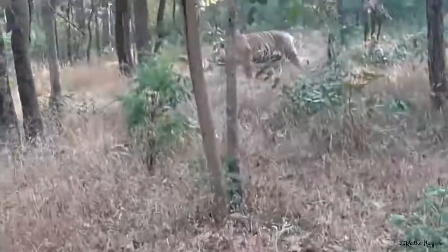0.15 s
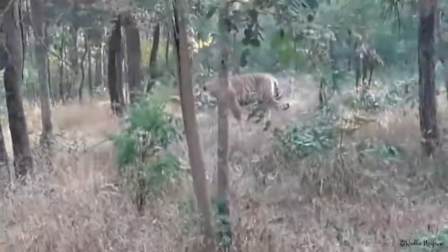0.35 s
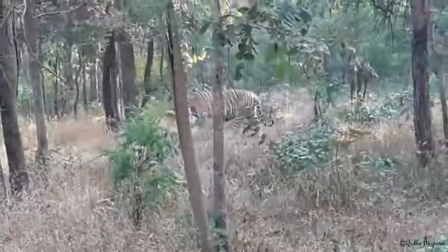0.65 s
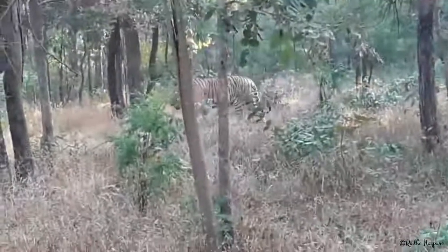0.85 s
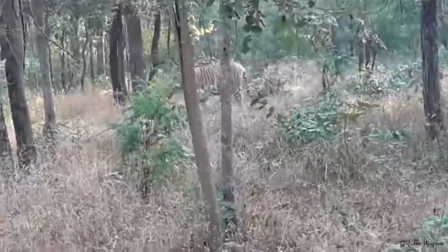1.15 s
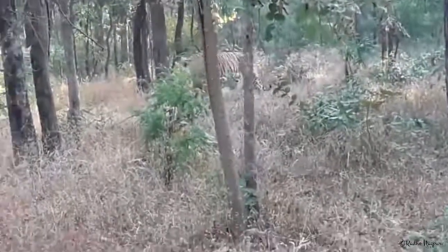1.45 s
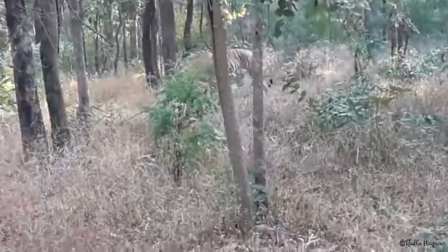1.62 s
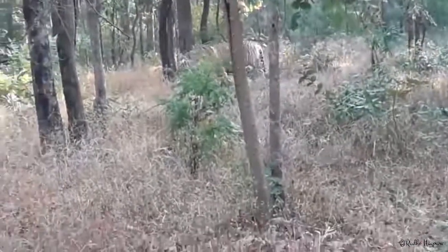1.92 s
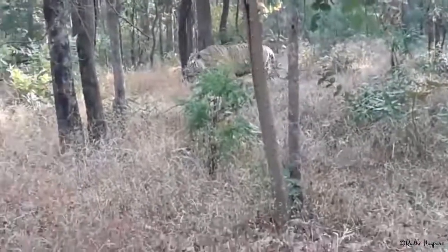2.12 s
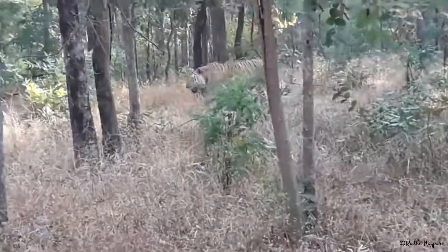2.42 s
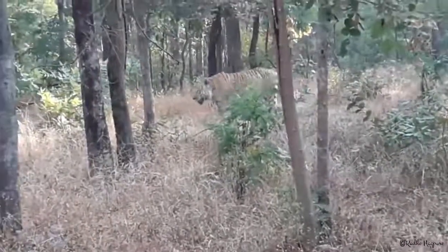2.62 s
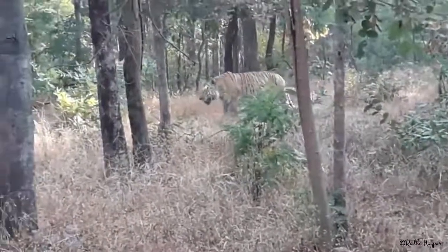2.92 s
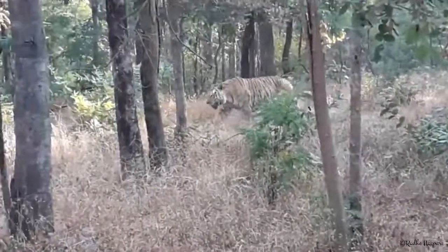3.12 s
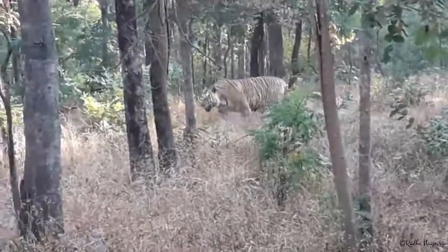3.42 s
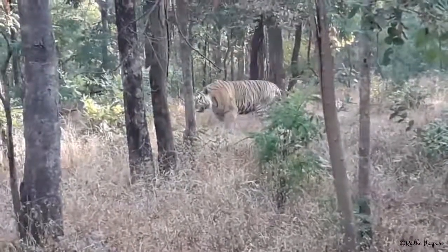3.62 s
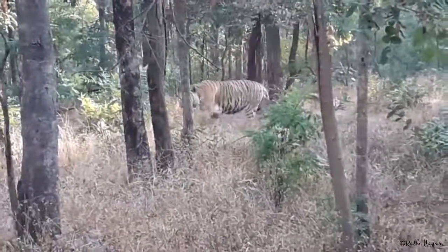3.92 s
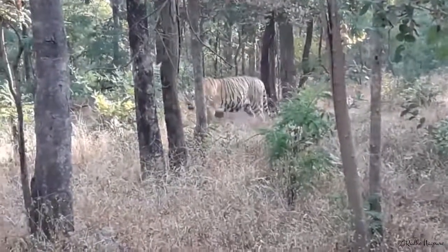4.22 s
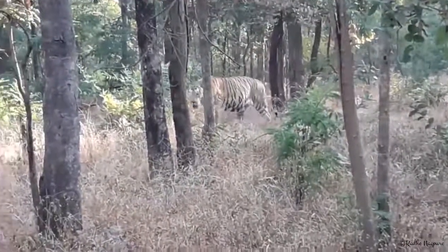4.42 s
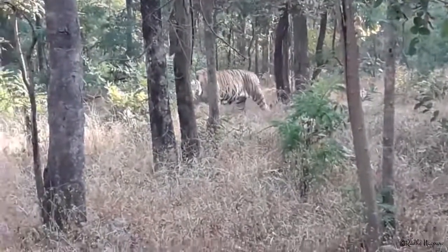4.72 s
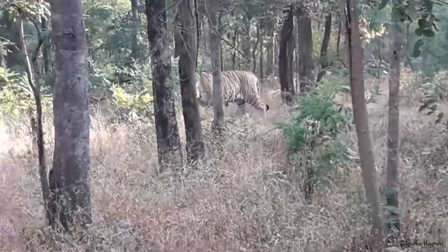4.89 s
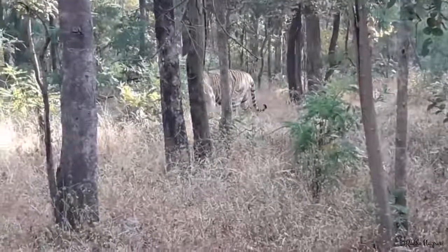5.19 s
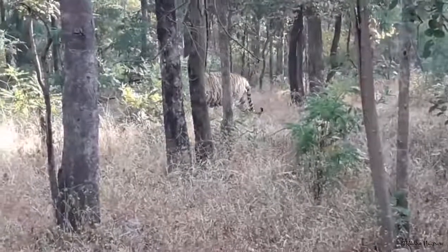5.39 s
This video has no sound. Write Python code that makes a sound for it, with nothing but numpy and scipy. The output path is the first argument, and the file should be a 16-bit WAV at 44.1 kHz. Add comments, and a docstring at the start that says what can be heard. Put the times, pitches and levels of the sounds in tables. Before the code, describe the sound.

Soft chirps and a quick tiny trill over very quiet forest air give way to an abrupt, wavering broadband noise. Rough, low monkey barks follow, each dropping to a grunt with a long woodland echo. One deer alarm call, whistle-sharp and by far the loudest event, cuts through after dry twig snaps. A rattling cough and a faint bark close it. Wide, natural outdoor pickup; the tiger stays silent.

```python
"""A small bird's slurred whistles over a hushed dry forest, on alert as a tiger (unheard) walks by; then the
background noise abruptly turns louder. A langur barks: pulsed vocal folds drop in pitch through throat
resonances that move as the jaw closes. A spotted deer gives one piercing yelp, a whistle over a low voice;
a second monkey coughs from pulsed folds. An insect whine, dry snaps, a rustle and the background are shaped
noise. Echoes of decaying noise blur the bird, and scatter and ring behind the larger callers and the snaps."""
import sys
import numpy as np
from scipy import signal
from scipy.fft import rfft, irfft, next_fast_len
from scipy.io import wavfile
from scipy.ndimage import map_coordinates

SR = 44100
rng = np.random.default_rng(int(sys.argv[2]) if len(sys.argv) > 2 else 0)


def wrap_up_sound(samples):
    """Save the sound to the file named by the first command line argument, as 16-bit audio."""
    columns = np.atleast_2d(samples).T
    # keep every value between -1 and 1, then stretch to whole-number steps
    tamed = np.clip(columns, -1, 1)
    steps = np.round(tamed * 32767).astype(np.int16)
    wavfile.write(sys.argv[1], SR, steps)


N = 244746
T = np.arange(N) / SR
CALL_T = np.arange(SR // 4) / SR  # time within one call, s


def amp(db):
    """Decibels to gain."""
    return 10 ** (np.asarray(db) / 20)


def unit(x):
    """Scale to rms 1."""
    return x / np.sqrt(np.mean(x ** 2) + 1e-20)


def along(points, hz):
    """(f/Hz, value) points interpolated on a log frequency axis."""
    f, v = np.transpose(points)
    return np.interp(np.log(hz + 1), np.log(f + 1), v)


def curves(rows, t):
    """Each column after the time, read at times t."""
    s, *cols = np.transpose(rows)
    return [np.interp(t, s, c) for c in cols]


def add(track, s, x):
    """Mix x into the track at time s."""
    part = track[max(round(s * SR), 0):][:len(x)]
    part += x[:len(part)]


def wobble(n, rate):
    """Smooth random curve of n samples, rate knots a second."""
    return map_coordinates(rng.standard_normal(2048), [np.arange(n) * rate / SR], mode="mirror")


def envelope(t, attack_s, hold_s, fall_db_per_s):
    """Gain that rises exponentially towards 1, and after the hold falls by a steady number of dB a second."""
    rise = 1 - np.exp(-np.maximum(t, 0) / attack_s)
    return rise * amp(-fall_db_per_s * np.maximum(t - hold_s, 0))


def swell(s, width_s):
    """Gaussian bump of height 1 at time s."""
    return np.exp(-.5 * ((T - s) / width_s) ** 2)


def filtered(x, response):
    """x times a complex response of frequency."""
    n = x.shape[-1]
    m = next_fast_len(n + 8192)
    return irfft(rfft(x, m) * response(np.fft.rfftfreq(m, 1 / SR)), m)[..., :n]


def resonate(x, modes, top_hz):
    """x through parallel resonances of alternating sign, rolled off above top_hz, at rms 1."""
    def body(f):
        total = 0
        for k, (center, width, db) in enumerate(modes):
            damping = 1j * f * width
            total = total + (-1) ** k * amp(db) * damping / (center * center - f * f + damping)
        return total / np.sqrt(1 + (f / top_hz) ** 6)
    return unit(filtered(x, body))


def spread(pair, alike):
    """Two unrelated signals become left and right of a given likeness."""
    turn = lambda f: np.arccos(np.clip(along(alike, f), -1, 1)) / 2
    mid, side = filtered(pair, lambda f: np.array([np.cos(turn(f)), np.sin(turn(f))]))
    return np.array([mid + side, mid - side])


# left-right likeness of the air noise: f/Hz, correlation
AIR_ALIKE = [(40, .3), (150, 0.27), (500, 0.71), (1400, 0.12), (3000, 0.051), (9000, 0.14)]


def air(colour):
    """Coloured stereo noise of rms 1."""
    noise = spread(rng.standard_normal((2, N)), AIR_ALIKE)
    return unit(filtered(noise, lambda f: amp(along(colour, f))))


# left-right likeness of the echoes: f/Hz, correlation
ECHO_ALIKE = [(200, 0.7), (700, 0.99), (1400, 0.8), (3200, 0.24), (8000, 0.47)]


def echo(x, decay, gap, build):
    """Diffuse stereo tail that arrives after a gap (s), builds up (s) and dies faster at some frequencies."""
    hz, t, z = signal.stft(rng.standard_normal((2, 2 * SR)), SR, nperseg=256)
    arrival = 1 - np.exp(-np.maximum(t - gap, 0) / build)
    fade = amp(-60 * t / along(decay, hz)[:, None])
    tail = signal.istft(z * fade * arrival, SR, nperseg=256)[1]
    tail = spread(tail, ECHO_ALIKE)
    return signal.fftconvolve(x[None], tail / np.linalg.norm(tail[0]), axes=1)[:, :N]


# decay of the scatter from near trunks: f/Hz, t60/s
TRUNKS = [(150, 0.15), (1500, 0.17), (4000, 0.53), (10000, 0.27)]
# decay of the deep forest's ring: f/Hz, t60/s
FOREST = [(120, 0.47), (500, 1.324), (1170, 1.85), (1800, 1.46), (3700, 1.94), (4500, 1.73), (7500, 1.22),
          (13000, 1.31)]


def among_trees(x, pan_db, near_db, far_db, gap, colour=((1000, 0),)):
    """Direct sound (pan > 0 is left), scatter from near trunks and the long coloured ring of the forest."""
    direct = x * amp([[pan_db / 2], [-pan_db / 2]])
    returned = filtered(x, lambda f: amp(along(colour, f)))
    near = amp(near_db) * echo(x, TRUNKS, gap, build=0.0033)
    far = amp(far_db) * echo(returned, FOREST, gap, build=0.029)
    return direct + near + far


def folds(pitch, rough, jitter, scatter_db):
    """Uneven vocal pulses with turbulence that puffs once a cycle; also returns the phase of the folds."""
    n = len(pitch)
    cycles = np.cumsum(pitch * np.exp(jitter * wobble(n, 250))) / SR
    pulses = np.diff(np.floor(cycles), prepend=-1)
    pulses = pulses * amp(scatter_db * wobble(n, 294.0)) / np.sqrt(pitch)
    puffs = unit(rng.standard_normal(SR)[:n] * np.exp(-2.2 * (cycles % 1)))
    share = np.clip(rough, 0, 1)
    voiced = np.sqrt(1 - share) * unit(pulses) + np.sqrt(share) * puffs
    # the folds close softly, so turbulence takes over in the treble
    soft = lambda f: 1 / (1 + (f / 4200) ** 4)
    low = filtered(voiced, lambda f: np.sqrt(soft(f)))
    high = filtered(puffs, lambda f: 1j * np.sqrt(1 - soft(f)))
    return low + high, 2 * np.pi * cycles


def sagging(hz, after_s, oct_per_s):
    """Pitch of a monkey's call: level at first, then sinking as the effort ends."""
    return hz * 2 ** (-oct_per_s * np.maximum(CALL_T - after_s, 0))


# still-air spectrum: f/Hz, relative level/dB
HUSH = [(25, -8), (70, 0), (112, -1), (413, -1.5), (828, -6), (1200, -4.5), (2270, -7.5), (2780, -4.5),
        (3330, -7.5), (5970, -11.5), (15000, -23.5)]
# still-air level before HUSH_GAIN_DB: t/s, level/dB
HUSH_LEVEL = [(0.0, -65), (0.18, -69.5), (0.99, -70), (2.15, -68)]
HUSH_GAIN_DB = 7.5
# louder noise spectrum: f/Hz, relative level/dB
LOUDER = [(15, -45.5), (25, -7.5), (81, -5.5), (115, -8), (301, -2), (501, -2), (749, -1.5), (1500, -1),
          (3730, -14), (4870, -15), (10000, -23), (12800, -63.5), (13800, -61), (15000, -59)]
# passing swells of the louder noise: t/s, half-width/s, boost/dB
LOUDER_SWELLS = [(2.57, 0.2, 4), (5.1, 0.17, 2)]
LOUDER_S, LOUDER_RISE_S, LOUDER_DB = 2.223, .016, -52.5
# rumble spectrum: f/Hz, relative level/dB
RUMBLE = [(18, -33), (30, -15), (71, -9.5), (225, -6.5), (264, -7.5), (362, -9.5), (700, -8.5), (910, -23),
          (1540, -120)]


def background():
    """Still air, louder wavering noise that starts abruptly and stays, and rumble opposite in the channels."""
    hush_db = HUSH_GAIN_DB + curves(HUSH_LEVEL, T)[0] + .4 * wobble(N, 8.8)
    hush = amp(hush_db) * air(HUSH)
    swells_db = sum(db * swell(s, width_s) for s, width_s, db in LOUDER_SWELLS)
    louder_gain = amp(LOUDER_DB + swells_db + 1.56 * wobble(N, 7.5))
    louder = louder_gain * envelope(T - LOUDER_S, LOUDER_RISE_S, 0, 0) * air(LOUDER)
    rumble = unit(filtered(rng.standard_normal(N), lambda f: amp(along(RUMBLE, f))))
    return hush + louder + amp(-60.5) * np.array([rumble, -rumble])


INSECT_S, INSECT_WIDTH_S, INSECT_DB = 2.08, 0.11, -74.5


def insect():
    """Faint, very high whine for a moment: noise through one narrow resonance."""
    whine = resonate(rng.standard_normal(N), [(10240, 60, 0)], top_hz=11900)
    return amp(INSECT_DB) * swell(INSECT_S, INSECT_WIDTH_S) * whine


# small knocks and snaps: t/s, level/dB, f/Hz, width/Hz, t60/s
SNAPS = [(2.665, -31.5, 776, 240, 0.012), (3.2394, -36, 1400, 586, 0.032),
         (3.2401, -37.5, 2880, 2500, 0.0075), (3.3227, -37, 1800, 4260, 0.012)]
# rustle spectrum: f/Hz, relative level/dB
RUSTLE_COLOUR = [(20, 2), (60, 5), (200, -6), (1200, 0.5), (4400, -4), (6000, -15), (12000, -29)]
RUSTLE_S, RUSTLE_DB, RUSTLE_WIDTH_S = 3.348, -41, .014  # peak time, level, half-width


def undergrowth():
    """Dry snaps, each a decaying resonant noise burst, and a short rustle of coloured noise."""
    out, t = np.zeros(N), np.arange(SR // 10) / SR
    for s, db, hz, width, t60 in SNAPS:
        knock = resonate(rng.standard_normal(len(t)), [(hz, width, 0)], top_hz=6940)
        add(out, s, amp(db - 60 * t / t60) * knock)
    rustle = amp(RUSTLE_DB) * swell(RUSTLE_S, RUSTLE_WIDTH_S) * air(RUSTLE_COLOUR)
    return among_trees(out, pan_db=6.0, near_db=-17, far_db=-22.5, gap=.003) + rustle


CASCADE_S, CASCADE_STEP_S, CASCADE_NOTE_S, CASCADE_SLIDE = .977, .071, .07, 1.13  # slide: start/settling pitch
CASCADE_FIRST_HZ, CASCADE_LAST_HZ, CASCADE_EASE, CASCADE_DB = 5950, 4130, 2.1, -58.5


def cascade(count):
    """Evenly spaced down-slurs that step down ever less."""
    ease = np.linspace(1, 0, count) ** CASCADE_EASE
    pitches = CASCADE_LAST_HZ + (CASCADE_FIRST_HZ - CASCADE_LAST_HZ) * ease
    return [(CASCADE_S + k * CASCADE_STEP_S, CASCADE_NOTE_S, hz, CASCADE_SLIDE, CASCADE_DB)
            for k, hz in enumerate(pitches)]


TRILL_S, TRILL_STEP_S, TRILL_NOTE_S, TRILL_SLIDE = 1.82, 0.026, 0.025, 1.13
TRILL_HZ, TRILL_CLIMB_HZ, TRILL_DB = 5780, 100, -53.5


def trill(count):
    """Quick, high down-slurs that climb slightly from note to note."""
    return [(TRILL_S + k * TRILL_STEP_S, TRILL_NOTE_S, TRILL_HZ + k * TRILL_CLIMB_HZ, TRILL_SLIDE, TRILL_DB)
            for k in range(count)]


# single whistles: t/s, length/s, settling f/Hz, starting pitch/settling pitch, level/dB before the canopy mix
SLURS = [(0.078, .06, 4320, 1.07, -63), (.09, 0.083, 3430, 1.04, -65.5), (0.245, 0.071, 5800, 0.7, -62.5),
         (0.303, 0.044, 2880, 1.32, -59.5), (0.368, .045, 5850, .78, -55.5), (.45, .07, 5960, 1.12, -63.5),
         (.91, .06, 6580, 1.02, -68), (1.112, 0.069, 3480, 1.1, -60), (1.245, 0.13, 3240, 1.07, -53.5),
         (1.41, .11, 3430, 1.03, -61), (1.422, .12, 2535, 1.05, -62.5), (1.572, 0.23, 6160, 1.03, -63.5),
         (1.578, 0.031, 3780, 1.13, -55.5), (1.582, 0.048, 3060, 1.18, -54.5),
         (1.66, 0.073, 3078, 1.01, -54), (1.762, 0.061, 5300, .96, -60), (1.843, 0.056, 3707, 1, -59),
         (1.96, 0.035, 3620, 0.98, -55), (2.011, .058, 4400, 1.03, -52.5), (2.053, 0.066, 3607, 1.06, -57)]


def bird():
    """Pure slurred whistles, each sliding fast and then settling, blurred by the canopy."""
    out = np.zeros(N)
    for s, length, hz, slide, db in SLURS + cascade(count=5) + trill(count=4):
        u = np.linspace(0, 1, max(round(length * SR), 2))
        pitch = hz * (1 + (slide - 1) * (1 - u) ** 1.42) * (1 + 0.013 * wobble(len(u), 195.6))
        arch = 2 * np.sqrt(u * (1 - u))
        add(out, s, amp(db) * arch * np.sin(2 * np.pi * np.cumsum(pitch) / SR))
    canopy = [(3000, 0.63), (6500, 0.53)]  # f/Hz, t60/s
    blur = echo(out, canopy, gap=0.00051, build=0.0012)
    return amp(-1.0) * out + amp(1.0) * (blur + 0.17 * blur[::-1])


# second monkey's throat resonances: f/Hz, width/Hz, relative level/dB
COUGH_THROAT = [(396, 74, 4), (810, 94, 5.5), (1160, 250, 3.5), (1505, 143, 6.5), (1870, 300, 3.5),
                (3120, 770, -2.5), (6500, 5500, -20.5)]
COUGH_S, COUGH_DB, COUGH_ATTACK_S, COUGH_HOLD_S, COUGH_FALL_DB_PER_S = 4.855, -29, 0.027, 0.058, 261.5
COUGH_HZ, COUGH_SAG_AFTER_S, COUGH_SAG_OCT_PER_S, COUGH_ROUGH = 193.7, .056, 7.5, 0.37


def second_monkey():
    """Rattling cough: unevenly pulsed folds of sagging pitch through fixed throat resonances."""
    out = np.zeros(N)
    pitch = sagging(COUGH_HZ, COUGH_SAG_AFTER_S, COUGH_SAG_OCT_PER_S)
    source, _ = folds(pitch, COUGH_ROUGH, jitter=.09, scatter_db=2.5)
    effort = envelope(CALL_T, COUGH_ATTACK_S, COUGH_HOLD_S, COUGH_FALL_DB_PER_S)
    add(out, COUGH_S, amp(COUGH_DB) * effort * resonate(source, COUGH_THROAT, top_hz=6500))
    return among_trees(out, pan_db=2.5, near_db=-1.5, far_db=-14.0, gap=0.0021)


# langur barks: t/s, level/dB, starting f/Hz, throat scale (ratio), attack/s, hold/s
BARKS = [(2.693, -23.9, 177.9, .96, 0.018, 0.068), (3.576, -24.3, 171.9, .96, 0.013, .072),
         (4.432, -22.5, 178.1, .98, 0.018, 0.068), (5.541, -33.5, 178, 0.96, .018, 0.075)]
# throat resonances before the throat scale: f/Hz, width/Hz, relative level/dB
JAW_WIDE = [(411, 200, -4.5), (733, 144, 1), (1970, 187, 9), (2413, 343, 4), (3797, 830, -5.5),
            (6260, 1600, -32.5)]
JAW_CLOSING = [(283, 56, -9.5), (837, 64, 1.5), (1596, 276, 1), (1850, 130, 5.5), (2460, 420, -6),
               (3200, 1660, -8), (6630, 4400, -18)]
# two lowest harmonics, one per row: level/dB with jaw wide, level/dB with jaw closing
CHEST = [(-25, -12.5), (-20, -13)]
BARK_FALL_DB_PER_S, BARK_ROUGH, BARK_JITTER = 497.5, 0.53, .055
BARK_SAG_AFTER_S, BARK_SAG_OCT_PER_S = .044, 9.5
JAW_STARTS_S, JAW_TAKES_S = 0.039, 0.054


def langur():
    """Harsh barks: the pitch drops to a grunt while the closing jaw shifts the throat resonances."""
    out = np.zeros(N)
    jaw = np.clip((CALL_T - JAW_STARTS_S) / JAW_TAKES_S, 0, 1)
    for s, db, hz, scale, attack_s, hold_s in BARKS:
        pitch = sagging(hz, BARK_SAG_AFTER_S, BARK_SAG_OCT_PER_S)
        source, phase = folds(pitch, BARK_ROUGH, jitter=BARK_JITTER, scatter_db=0.8)
        wide = resonate(source, np.array(JAW_WIDE) * [scale, 1, 1], top_hz=7500)
        closing = resonate(source, np.array(JAW_CLOSING) * [scale, 1, 1], top_hz=8500)
        # the two lowest harmonics stay smooth and grow as the jaw closes
        chest = sum(amp(early + (late - early) * jaw) * np.cos(k * phase)
                    for k, (early, late) in enumerate(CHEST, 1))
        voice = unit(np.sqrt(1 - jaw) * wide + np.sqrt(jaw) * closing) + chest
        add(out, s, amp(db) * envelope(CALL_T, attack_s, hold_s, BARK_FALL_DB_PER_S) * voice)
    colour = [(150, -1), (700, -3), (1500, 4.5), (2100, -1.0), (3300, 2.0)]  # f/Hz, level/dB
    return among_trees(out, pan_db=-2.0, near_db=-1.5, far_db=-13.0, gap=0.0045, colour=colour)


DEER_HOLD_S, DEER_FALL_DB_PER_S = .1, 1895  # shared by the whistle and the held low voice
YELP_S, YELP_HZ, YELP_RISE_HZ_PER_S, YELP_DB, YELP_ROUGH = 3.375, 356.4, 2250, -31.5, .27


def yelp_pitch():
    """The deer's low voice climbs for as long as the call is held."""
    return YELP_HZ + YELP_RISE_HZ_PER_S * np.minimum(CALL_T, DEER_HOLD_S)


# deer throat resonances: f/Hz, width/Hz, relative level/dB
DEER_THROAT = [(484, 280, -3), (1113, 280, 3), (1630, 1200, 0.5), (2257, 270, 3.5), (2764, 240, 1)]
# treble cut of the low voice: f/Hz, level/dB
YELP_TOP = [(4000, 0), (6000, 0), (12000, -25.5)]
# bursts as the throat opens and shuts: t/s, level/dB, attack/s, fall/(dB/s)
YELP_BURSTS = [(3.375, -13.5, 0.0024, 1800), (3.4744, -15, .0015, 600.5)]


def yelp():
    """Low voice of pulsed folds: quiet under the whistle, with a burst at either end."""
    source, _ = folds(yelp_pitch(), YELP_ROUGH, jitter=0.046, scatter_db=5.0)
    held = amp(YELP_DB) * envelope(CALL_T, WHISTLE_ATTACK_S, DEER_HOLD_S, DEER_FALL_DB_PER_S)
    bursts = sum(amp(db) * envelope(CALL_T + YELP_S - s, attack_s, 0, fall)
                 for s, db, attack_s, fall in YELP_BURSTS)
    voice = (held + bursts) * resonate(source, DEER_THROAT, top_hz=3570)
    return filtered(voice, lambda f: amp(along(YELP_TOP, f)))


# whistle pitch before jitter: t/s, f/Hz
WHISTLE_PITCH = [(3.378, 3499), (3.41, 3739), (3.436, 3694), (3.454, 3829), (3.46, 4104), (3.47, 4099)]
# second, third and fourth harmonics before strain: level/dB
OVERTONES_DB = [-17, -30.5, -40.5]
# mouth response: f/Hz, level/dB
DEER_MOUTH = [(1200, -23), (2600, -2.5), (3400, -1), (4400, 2.5), (5200, -13), (6400, -10.5), (7400, 1),
              (8600, -2), (9700, -4), (11200, 4.5), (15000, -3.5)]
WHISTLE_S, WHISTLE_DB, WHISTLE_ATTACK_S, WHISTLE_TIRE_DB_PER_S = 3.3772, -5.5, 0.00055, 154.5
WHISTLE_ROUGH_START, WHISTLE_ROUGH_END = 0.039, 0.57


def whistle():
    """Rising tone that starts nearly clean, weakens and breaks up as the low voice shakes it into sidebands."""
    n, progress = len(CALL_T), np.clip(CALL_T / DEER_HOLD_S, 0, 1)
    pitch, = curves(WHISTLE_PITCH, WHISTLE_S + CALL_T)
    rough = WHISTLE_ROUGH_START + (WHISTLE_ROUGH_END - WHISTLE_ROUGH_START) * progress ** 1.38
    rough = np.clip(rough, 0, 1)
    depth = np.sqrt(rough)
    flutter_hz = yelp_pitch() * (1 + .2 * depth * wobble(n, 400))
    flutter = np.sin(2 * np.pi * np.cumsum(flutter_hz) / SR)
    phase = 2 * np.pi * np.cumsum(pitch * (1 + 0.029 * depth * wobble(n, 900))) / SR
    # each overtone wavers on its own and grows as the voice strains
    strain_db = -9 + 14 * progress
    overtones = 0
    for k, level in enumerate(OVERTONES_DB, 2):
        gain = amp(level + strain_db + 2.1 * wobble(n, 200))
        overtones = overtones + gain * np.sin(k * phase + 0.65 * (k - 1) * wobble(n, 1200))
    shaken = (np.sin(phase) + overtones) * (1 + 1.12 * depth * flutter)
    tone = shaken * amp(7.7 * rough * wobble(n, 500))
    force = amp(WHISTLE_DB - WHISTLE_TIRE_DB_PER_S * CALL_T)
    force = force * envelope(CALL_T, WHISTLE_ATTACK_S, DEER_HOLD_S, DEER_FALL_DB_PER_S)
    return filtered(force * tone, lambda f: amp(along(DEER_MOUTH, f)))


# colour of the forest's ring after the deer: f/Hz, level/dB
DEER_RETURN = [(400, 6.5), (850, -20.5), (1080, -8), (1170, 9.5), (1270, -3.5), (1750, 2), (2700, -7),
               (3500, -10), (3950, 3.5), (4350, -1.5), (5200, 5), (7500, -3.5), (9000, -14.5)]


def deer():
    """Piercing whistle and low yelp together; close trunks flash the whistle back from the sides."""
    high, low = np.zeros(N), np.zeros(N)
    add(high, WHISTLE_S, whistle())
    add(low, YELP_S, yelp())
    flash = echo(high, [(4000, .16)], gap=.022, build=.003)
    # arriving from the sides, it is almost wholly opposite in the two channels
    sides = amp(-7) * (flash - 0.91 * flash[::-1])
    call = among_trees(high + low, pan_db=1.5, near_db=-10.5, far_db=-9, gap=0.0072, colour=DEER_RETURN)
    return call + sides


def scene():
    """All the callers over the forest background."""
    return background() + insect() + undergrowth() + bird() + second_monkey() + langur() + deer()


TOP_HZ = 15800


def record(dry):
    """The microphone lifts the deepest bass, dulls the top octave and keeps nothing from TOP_HZ up."""
    microphone = [(15, 9.5), (40, -0.5), (11500, 0), (12800, -10), (14000, -11.5)]  # f/Hz, level/dB
    return filtered(dry, lambda f: amp(along(microphone, f)) * (f < TOP_HZ))


dry = scene()
out = record(dry)
wrap_up_sound(out)
```